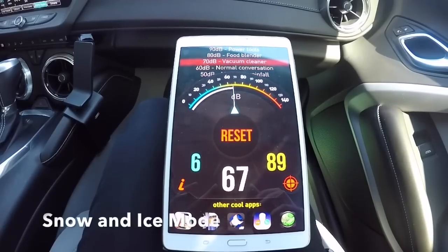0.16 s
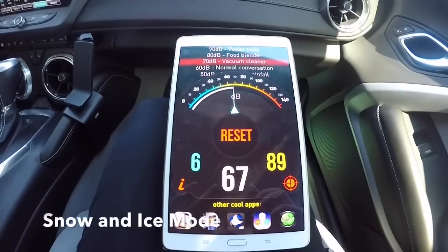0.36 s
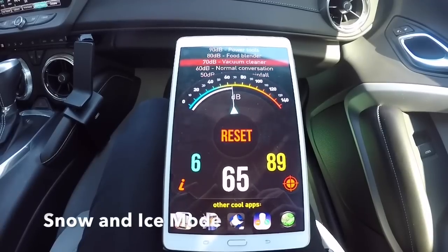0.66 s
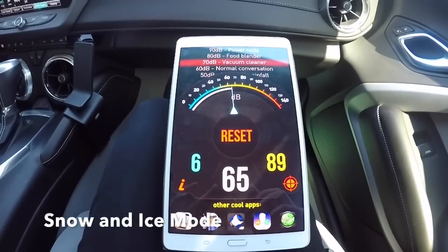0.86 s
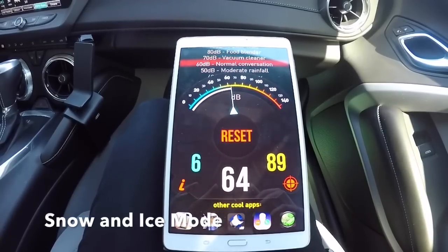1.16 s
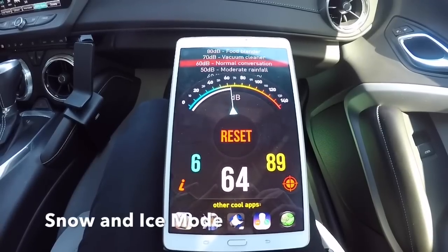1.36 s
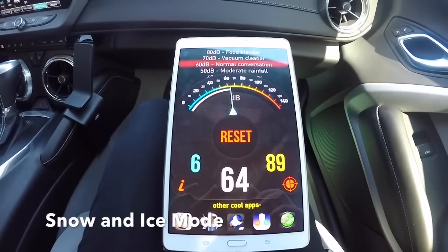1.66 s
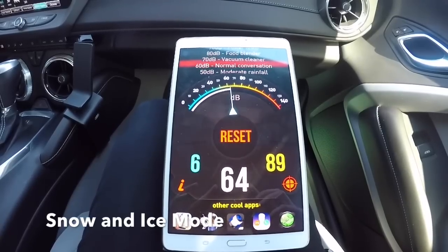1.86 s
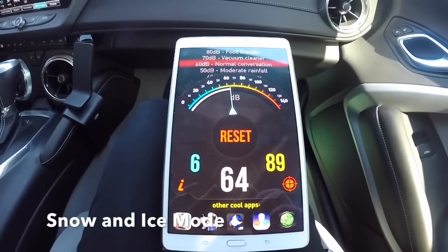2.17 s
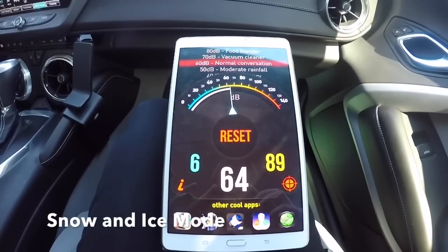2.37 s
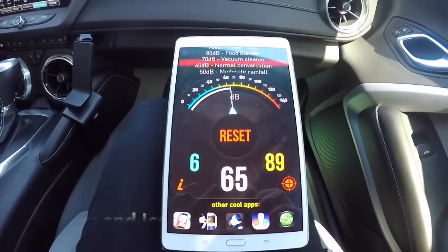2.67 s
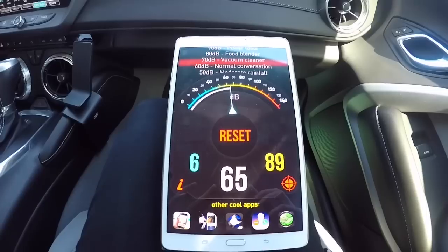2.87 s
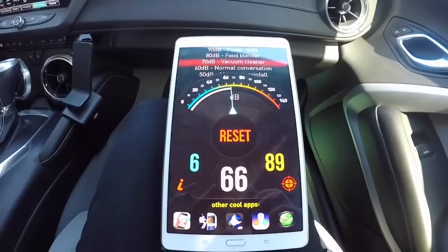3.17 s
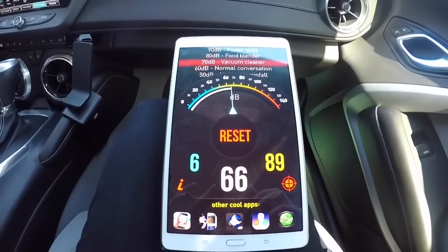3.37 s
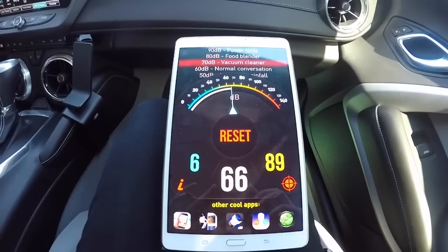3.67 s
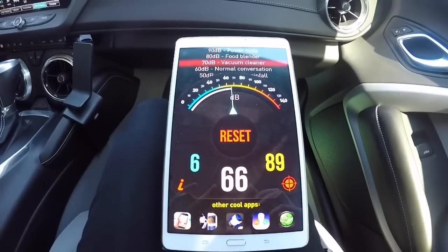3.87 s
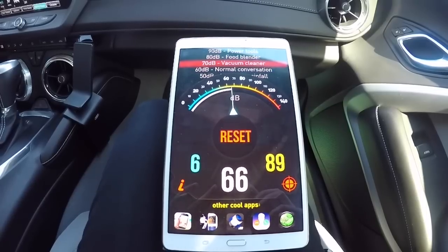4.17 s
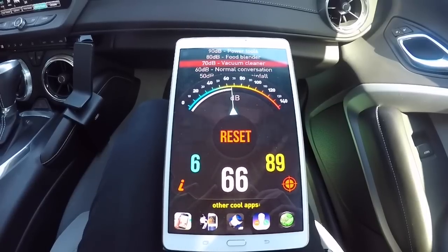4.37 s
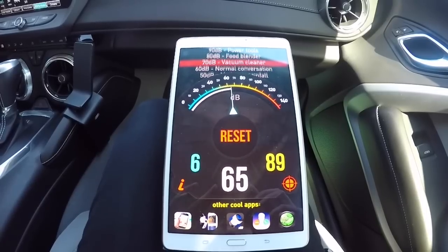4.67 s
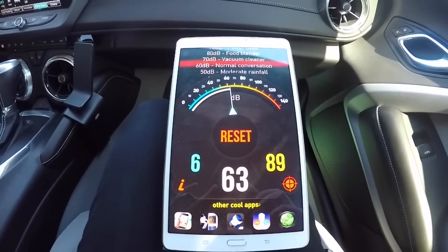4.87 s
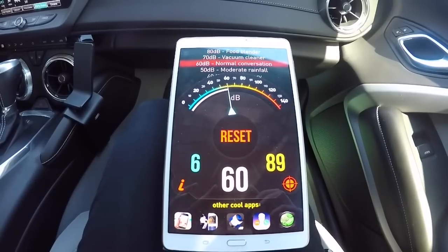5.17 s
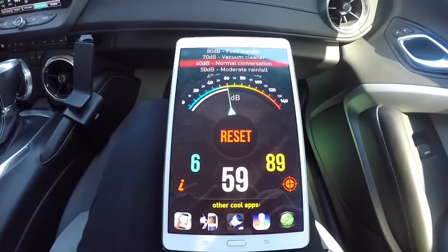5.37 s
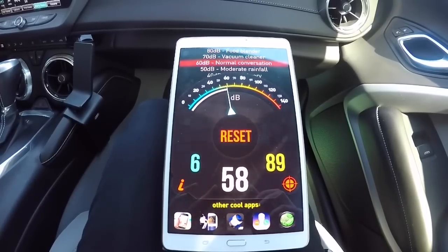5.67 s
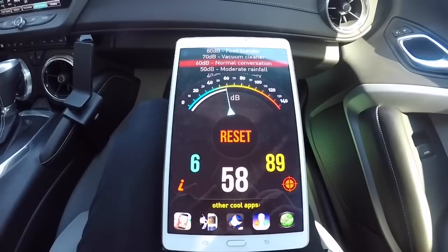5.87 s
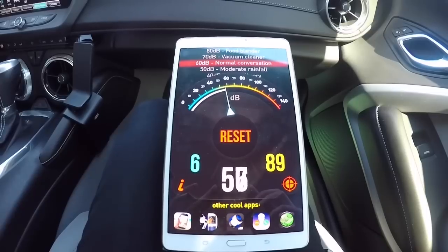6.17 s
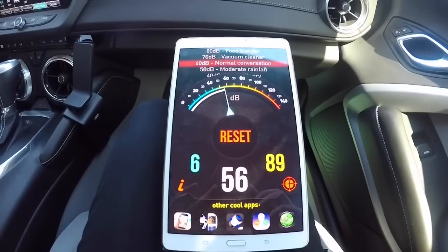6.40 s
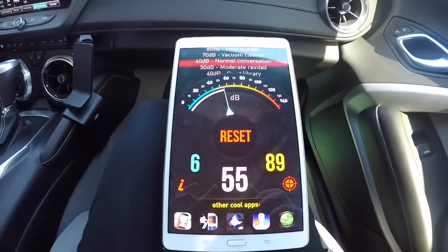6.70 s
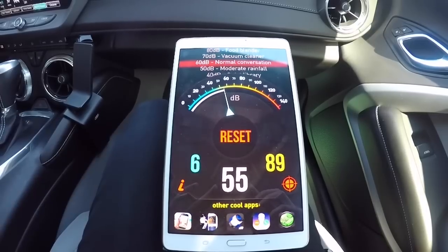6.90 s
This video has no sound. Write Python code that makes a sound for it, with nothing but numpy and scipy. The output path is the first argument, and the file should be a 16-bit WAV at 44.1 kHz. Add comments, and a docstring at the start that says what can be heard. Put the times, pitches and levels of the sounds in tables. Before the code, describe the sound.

Low, steady V8 idle boom fills a cabin, a switch clicks twice, and the exhaust drops to a muted burble with soft vent hiss.

```python
"""A big V8 idles at about 580 rpm, heard from the passenger side of the closed cabin.
Its exhaust, a near sine at the firing rate, booms until the muffler valves shut and leave a softer, lumpy
rumble; uneven cylinders and firing pulses through resonances add the burble. Filtered noise makes the vent
hiss and a deep buffeting that swells near the end. A switch clicks twice and something bumps softly, as noise
puffs and struck modes; a tablet's screen whines faintly, as a sine pulsing once a frame."""
import sys
import numpy as np
from scipy import signal
from scipy.io import wavfile

SR = 44100
rng = np.random.default_rng(int(sys.argv[2]) if len(sys.argv) > 2 else 0)


def int16_out(signal):
    """Quantize to a 16-bit WAV file."""
    q = np.round(np.clip(np.atleast_2d(signal).T, -1, 1) * 32767)
    wavfile.write(sys.argv[1], SR, q.astype(np.int16))


N = 310464
TIME = np.arange(N) / SR

# Cylinders in firing order. Each row: relative pulse level in dB, bank (0 or 1).
CYLINDER_PULSES = [(4, 0), (-2, 1), (-2, 0), (-1, 1), (3, 1), (-1, 0), (-3, 1), (-1, 0)]
# Modes of the switch and its plastic trim. Each row: frequency in Hz, relative level in dB, t60 in s.
TRIM_MODES = [(346, -17, .04), (514, -10.5, 0.055), (766, -17.5, 0.05), (1090, -7, 0.027),
              (1250, -8.5, 0.035), (1640, -13, .022), (1950, -9.5, 0.02), (2390, -7, 0.02),
              (2520, -4, 0.026), (3370, -12, 0.028), (4000, -22, 0.015), (5130, -21, .02),
              (5700, -17, 0.018), (5950, -6.5, 0.022), (6780, -8.5, 0.016), (7580, -17, 0.014),
              (8830, -19, 0.016), (10300, -30, .008)]


def from_db(db):
    """Decibels to gain."""
    return 10 ** (np.asarray(db) / 20)


def rms_one(x):
    """Scale to an rms of 1."""
    return x / np.sqrt(np.mean(x ** 2) + 1e-20)


def in_time(rows):
    """Join (s, value) rows by straight lines."""
    return np.interp(TIME, *np.transpose(rows))


def at_hz(points, hz):
    """Read (Hz, value) rows on a log-frequency axis."""
    freqs, values = np.transpose(points)
    return np.interp(np.log(hz), np.log(freqs), values)


def ramp(start_s, length_s):
    """Go from 0 to 1 in a straight line, then hold."""
    return np.clip((TIME - start_s) / length_s, 0, 1)


def drift(rate_hz):
    """Slow random wander of rms 1: noise through two equal poles, run at every 40th sample."""
    step = 40
    pole = np.exp(-2 * np.pi * rate_hz * step / SR)
    noise = rng.standard_normal(N // step + 2002)
    slow = signal.lfilter([1], [1, -2 * pole, pole * pole], noise)[2000:]  # settled part
    return np.interp(np.arange(N) / step, np.arange(len(slow)), rms_one(slow))


def band(x, low_hz, high_hz):
    """Butterworth band-pass."""
    sos = signal.butter(2, [low_hz, high_hz], "band", fs=SR, output="sos")
    return signal.sosfilt(sos, x + 1e-18)


def low_pass(x, order, cutoff_hz):
    """Butterworth low-pass."""
    return signal.sosfilt(signal.butter(order, cutoff_hz, fs=SR, output="sos"), x)


def resonate(drive, modes):
    """Steep-sided resonances in parallel, each at its own rms level."""
    out = 0
    for hz, width_hz, db in modes:
        edges = hz - width_hz / 2, hz + width_hz / 2
        out = out + from_db(db) * rms_one(band(band(drive, *edges), *edges))
    return out


def ring(clicks, hz, t60_s):
    """Two-pole resonator: a unit click starts a decaying sine of initial height 1."""
    pole = np.exp(-np.log(1000) / (t60_s * SR))
    w = 2 * np.pi * hz / SR
    return signal.lfilter([0, np.sin(w)], [1, -2 * pole * np.cos(w), pole * pole], clicks + 1e-18)


def strike(events, modes):
    """Blows (s, dB) ring the modes of one body, alternating in sign."""
    clicks = np.zeros(N)
    for s, db in events:
        clicks[round(s * SR)] += from_db(db)
    out = 0
    for k, (hz, db, t60_s) in enumerate(modes):
        out = out + (-1) ** k * from_db(db) * ring(clicks, hz, t60_s)
    return out


def burst(events, t60_s):
    """Each blow (s, dB) sets off a short, decaying puff of noise."""
    envelope = 0
    for s, db in events:
        decay = np.exp(-np.log(1000) * np.abs(TIME - s) / t60_s)
        envelope = envelope + from_db(db) * (TIME >= s) * decay
    return envelope * rng.standard_normal(N)


def reflections(x, t60_s):
    """Dense, quickly dying echoes off glass and dashboard, different on each side."""
    t = TIME[:SR // 10]
    echoes = rng.standard_normal((2, len(t))) * np.exp(-np.log(1000) * t / t60_s)
    echoes = echoes / np.sqrt(np.sum(echoes ** 2) / 2)
    return signal.fftconvolve(x[None], echoes, axes=1)[:, :N]


def boom(firings, shut, waver_db=0.4, overtone_waver_db=2.7):
    """The muffler rounds the pulses to a near sine with two wavering overtones; it drops as the valves shut."""
    # Each row: time in s, level of the fundamental in dB rms.
    boom_levels = [(0.0, -18), (0.13, -19), (0.24, -20.5), (0.95, -20.5), (1.85, -21), (1.99, -22.5),
                   (2.5, -19.5), (2.85, -20.5), (3.12, -19), (3.32, -21.5), (3.55, -18.5), (4.1, -20.5),
                   (4.63, -20), (4.71, -27.5), (5.15, -25), (5.8, -28.5), (5.9, -30.5), (6.5, -31.5),
                   (6.58, -34), (6.78, -24.5), (7.04, -29)]
    # Each row: multiple of the firing rate, dB re fundamental with the valves open, same with them shut.
    overtones = [(2, -20.3, -19), (3, -22.3, -20.5)]
    turn = 2 * np.pi * firings
    wave = np.cos(turn)
    for k, open_db, shut_db in overtones:
        level_db = open_db + shut * (shut_db - open_db) + overtone_waver_db * drift(3.1)
        wave = wave + from_db(level_db) * np.cos(round(k) * turn)
    return -np.sqrt(2) * from_db(in_time(boom_levels) + waver_db * drift(4.0)) * wave


def pulses(firings, uneven_db, jitter_firings, rough, bank_lag_s=0.0012):
    """One puff per firing, trailed by turbulent gas; one bank's longer pipe makes the uneven order burble."""
    at = np.flatnonzero(np.diff(np.floor(firings + jitter_firings * drift(20))) > 0)
    cylinder_db, bank = np.resize(CYLINDER_PULSES, (len(at), 2)).T
    arrive = np.clip(at + np.round(bank) * bank_lag_s * SR, 0, N - 1).astype(int)
    train = np.zeros(N)
    train[arrive] = from_db(cylinder_db + uneven_db * rng.standard_normal(len(at)))
    gas = rng.standard_normal(N) * np.exp(-2.5 * (firings % 1))
    return rms_one(train) + rough * rms_one(gas)


def shake(firings, shut, waver_db=3.3, slip_rad=0.25):
    """Unequal cylinders shake mounts and pipes: wavering lines between the firing harmonics, a loping idle."""
    # Each row: multiple of the four-stroke cycle rate, dB rms with the valves open, dB rms with them shut.
    cycle_lines = [(4, -48.5, -57), (5, -55, -57), (6, -53, -52), (7, -58, -48), (9, -47.5, -52),
                   (10, -51, -53), (12, -51, -55), (13, -56, -58), (15, -57, -55), (18, -47, -47),
                   (20, -57, -58), (21, -62, -56), (23, -53, -57), (28, -56, -62), (33, -56, -56),
                   (36, -59, -58), (45, -57, -72), (49, -56, -72), (52, -60, -63), (58, -62, -65)]
    cycle = 2 * np.pi * firings / len(CYLINDER_PULSES)
    out = 0
    for k, open_db, shut_db in cycle_lines:
        gain = from_db(open_db + shut * (shut_db - open_db) + waver_db * drift(3.2))
        phase = 2 * np.pi * rng.random() + slip_rad * drift(0.36)
        out = out + gain * np.sin(round(k) * cycle + phase)
    return np.sqrt(2) * out


def engine(wander_hz=0.0756, left_lag_s=0.00027):
    """One crankshaft phase drives boom, shake, cabin and pipe; shutting valves lengthen the gas path."""
    # The idle hunts a little. Each row: time in s, mean firings per s.
    firing_rates = [(0.0, 38.68), (1.1, 38.45), (2.7, 38.6), (3.1, 39.0), (3.7, 38.74), (5.7, 38.7),
                    (6.4, 38.35), (7.04, 38.7)]
    # Cabin booms. Each row: centre in Hz, width in Hz, level in dB rms.
    cabin_modes = [(77, 80, -54), (115.7, 55.5, -51), (167, 14, -66), (176.2, 12.2, -48),
                   (248.8, 19.9, -51), (265.9, 27.1, -50.5), (277.6, 15.6, -55.5), (405, 18, -82),
                   (445, 51, -67.5), (503.4, 43, -76), (737.7, 73, -65)]
    # Straight path through the open muffler. Each row: centre in Hz, width in Hz, dB rms before the valve fade.
    open_pipe_modes = [(124.54, 27.4, -43.5), (223.25, 16.6, -48), (234.35, 20.6, -47)]
    shut_at_s, shut_takes_s = 4.63, 0.078
    detour_s, settles_s = 0.0086, 0.16  # added delay, time to build up
    speed = in_time(firing_rates) + wander_hz * drift(2.43)
    shut = ramp(shut_at_s, shut_takes_s)
    firings = np.cumsum(speed) / SR - ramp(shut_at_s, settles_s) * detour_s * speed.mean()
    puffs = pulses(firings, uneven_db=2.8, jitter_firings=0.008, rough=0.18)
    right = boom(firings, shut) + shake(firings, shut)
    right = right + resonate(puffs, cabin_modes)
    right = right + (1 - shut) * resonate(puffs, open_pipe_modes)
    left = np.interp(TIME - left_lag_s, TIME, right)
    return np.array([left, right])


def switch(ring_db=-13.0, echo_db=-5.0):
    """Plastic switch: dull finger pat, a band-passed snap per contact, trim ring and short echoes."""
    # Finger landing. Each row: time in s, noise level in dB before the band-pass.
    finger_pats = [(3.569, -25.5)]
    # Contacts: slack taken up, then the snap over. Each row: time in s, snap noise in dB before its band-pass,
    # band from Hz, band up to Hz, trim strike in dB before ring_db.
    contacts = [(3.569, -35.5, 1700, 2500, -41), (3.5712, -41, 1900, 7000, -37.5),
                (3.5765, -41, 1700, 2600, -47), (3.6988, -36, 1500, 7000, -30),
                (3.7006, -28, 1400, 3000, -18.5), (3.7024, -31.5, 500, 7000, -16),
                (3.705, -20.5, 500, 1600, -26), (3.710, -39, 1300, 3600, -29)]
    pat = band(burst(finger_pats, t60_s=0.05), 280, 560)
    snaps = 0
    for s, db, low_hz, high_hz, _ in contacts:
        snaps = snaps + band(burst([(s, db)], t60_s=0.018), low_hz, high_hz)
    trim = from_db(ring_db) * strike([(s, db) for s, *_, db in contacts], TRIM_MODES)
    click = pat + snaps + trim
    return click + from_db(echo_db) * reflections(click, t60_s=0.028)


def bump(soft_hz=1600, tick_db=-25.0, trim_db=-39):
    """A low thud and a light tick stir the trim; a softened knock rocks the two sides in opposite phase."""
    # Each row: time in s, blow level in dB.
    blows = [(5.6357, -15)]
    # Thud through the air. Each row: frequency in Hz, dB re blow, t60 in s.
    thud_modes = [(106, 0.6, 0.077), (149, -1.3, 0.034), (226, -10.5, 0.048), (373, -16.5, 0.029),
                  (626, -25, 0.025), (1360, -42, 0.021), (2180, -45, .028)]
    # Opposite-phase rocking. Each row: frequency in Hz, dB re blow before the low-pass, t60 in s.
    rocking_modes = [(1000, 0.5, .006), (350, -1, .011), (170, -9, .02), (75, -16, .09)]
    rocking = low_pass(strike(blows, rocking_modes), 6, soft_hz)
    tick = from_db(tick_db) * band(burst(blows, t60_s=0.045), 300, 2400)
    trim = from_db(trim_db) * strike(blows, TRIM_MODES)
    return strike(blows, thud_modes) + tick + trim + rocking * np.array([[1], [-1]])


def screen(whine_db=-63, tick_db=-67.5, left_db=-12, frame_hz=59.94):
    """The display's circuit whines in bursts, once a frame, and ticks as it switches; weaker on the left."""
    # Whine over one refresh. Each row: share of the frame, relative level in dB.
    whine_shape = [(0, -2), (.08, 0), (.22, 0), (.33, -18), (.66, -16), (.82, -5), (.95, -4)]
    # Each row: share of the frame, relative tick level in dB.
    frame_ticks = [(.25, 0), (.56, -6), (.82, -11)]
    frames = TIME * frame_hz
    swell = from_db(np.interp(frames, *np.transpose(whine_shape), period=1))
    whine = swell * np.sin(2 * np.pi * 7780 * TIME + 1.7 * drift(21))
    sparks = 0
    for share, db in frame_ticks:
        sparks = sparks + from_db(db) * np.exp(-((frames - share) % 1) / 0.05)
    ticks = band(sparks * rng.standard_normal(N), 6360, 7470)
    both = from_db(whine_db) * rms_one(whine) + from_db(tick_db) * rms_one(ticks)
    return both * np.array([[from_db(left_db)], [1]])


def air(level_db=-38.5, flicker_db=0.78, lean_db=1.87):
    """Vent air and steady rumble: third-octave noise, alike on both sides in the bass; top hiss leans right."""
    # Each row: frequency in Hz, relative level in dB per Hz.
    air_spectrum = [(20, -15.5), (60, 2), (135, -5), (185, -9.5), (280, -17.5), (350, -18.5), (700, -22.5),
                    (1200, -28), (2200, -37.5), (4500, -46), (6300, -43), (8000, -42.5), (10000, -43.5),
                    (13000, -54)]
    # Each row: frequency in Hz, left-right correlation (-1 to 1).
    likeness = [(60, 0.78), (130, 0.96), (290, 0.64), (430, 0.14), (650, -0.57), (1300, -0.72),
                (2400, -0.03), (4200, 0.27), (11000, -0.16)]
    edges_hz = 16 * 2 ** (np.arange(31) / 3)
    white = rng.standard_normal((2, 2, N))  # neighbouring bands use different noise
    sides = np.array([[1], [-1]])
    out = 0
    for k, (low_hz, high_hz) in enumerate(zip(edges_hz, edges_hz[1:])):
        mid, side = band(white[k % 2], low_hz, high_hz)
        hz = np.sqrt(low_hz * high_hz)
        alike = np.clip(at_hz(likeness, hz), -1, 1)
        gain = from_db(at_hz(air_spectrum, hz) + flicker_db * drift(13.6))
        lean = from_db(-sides * lean_db * (hz > 6500))  # left down, right up
        out = out + gain * lean * (np.sqrt(1 + alike) * mid + np.sqrt(1 - alike) * side * sides)
    return from_db(level_db) * rms_one(out)


def buffet(bed_db=-46.5, swell_db=13, swell_at_s=6.57, rise_s=0.2):
    """Deep, uneven buffeting: a faint bed of 18-36 Hz noise that swells near the end."""
    rumble = rms_one(band(rng.standard_normal(N), 18, 36))
    return from_db(bed_db + swell_db * ramp(swell_at_s, rise_s)) * rumble


def scene():
    """Sum the engine, the small sounds and the background, left and right."""
    return engine() + switch() + bump() + screen() + air() + buffet()


def record(dry):
    """Cut the top steeply above 12.2 kHz."""
    return low_pass(dry, 12, 12200)


dry = scene()
out = record(dry)
int16_out(out)
```